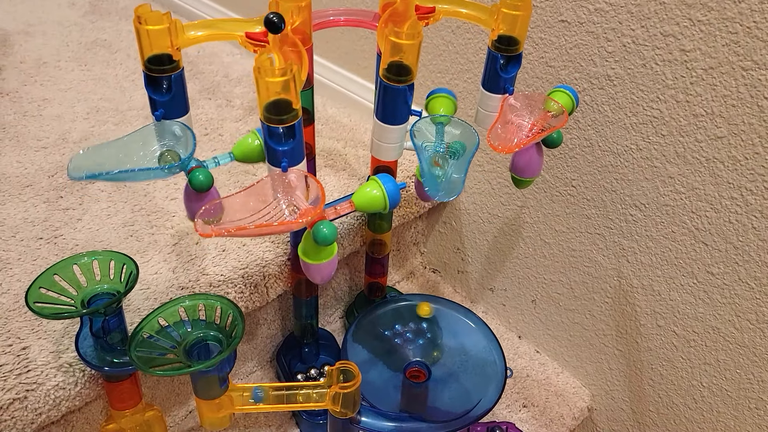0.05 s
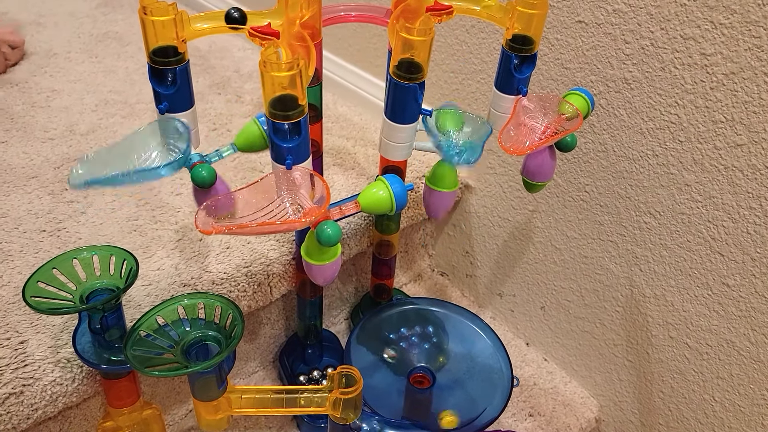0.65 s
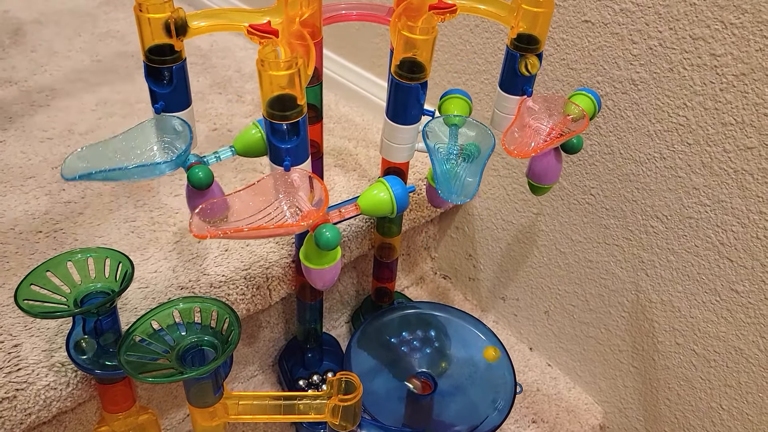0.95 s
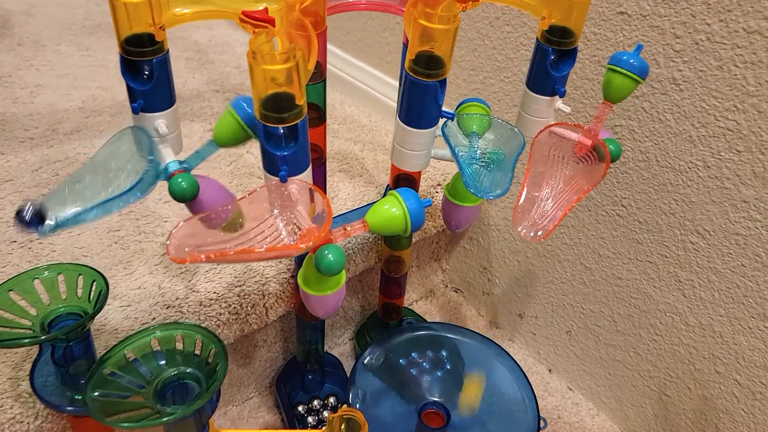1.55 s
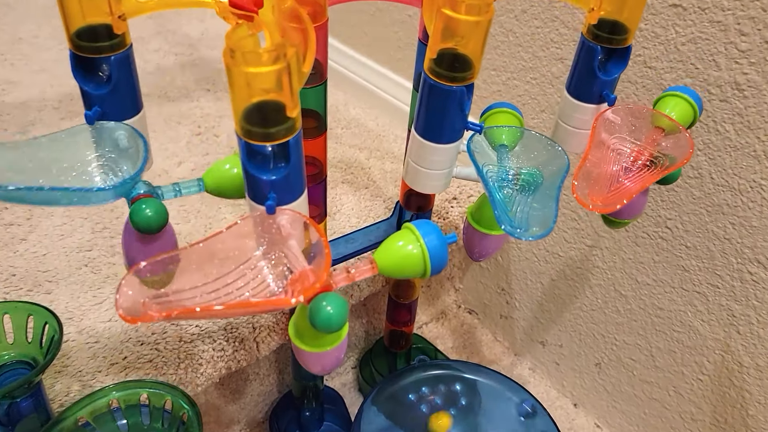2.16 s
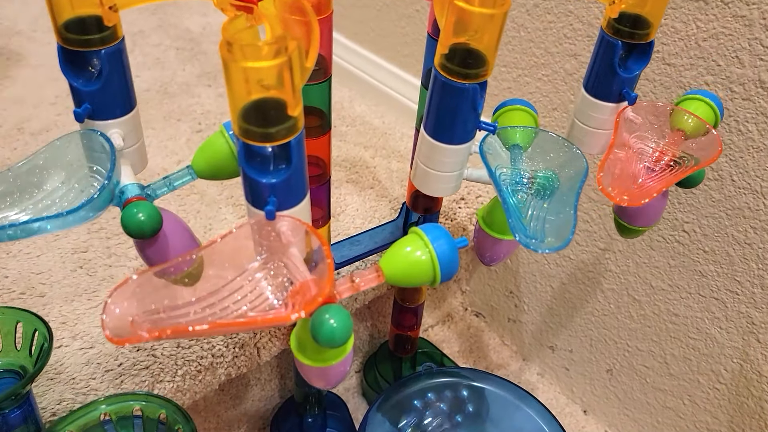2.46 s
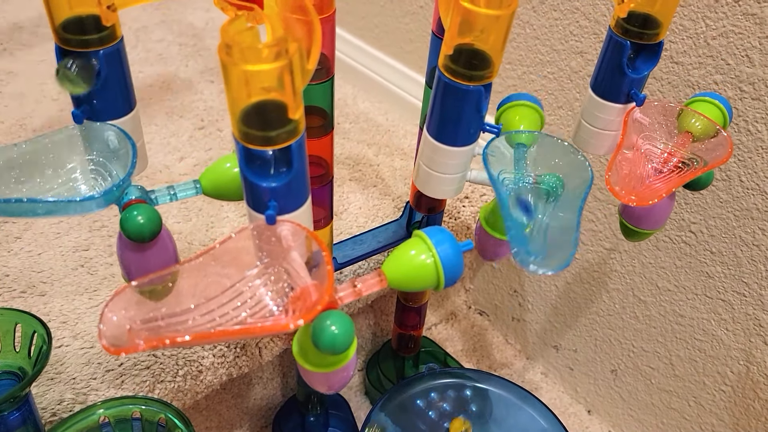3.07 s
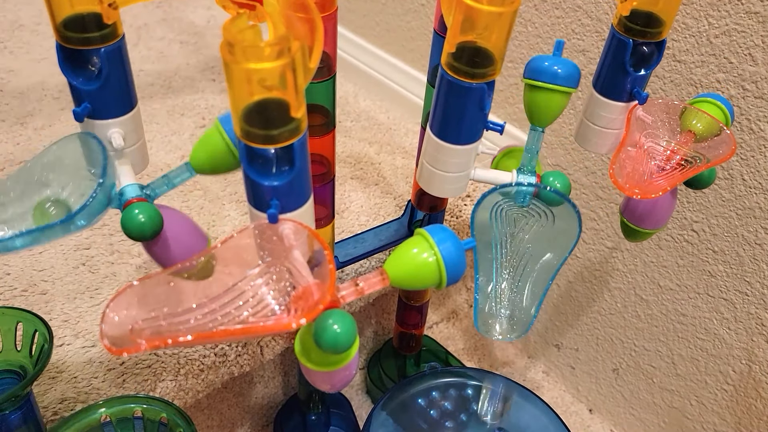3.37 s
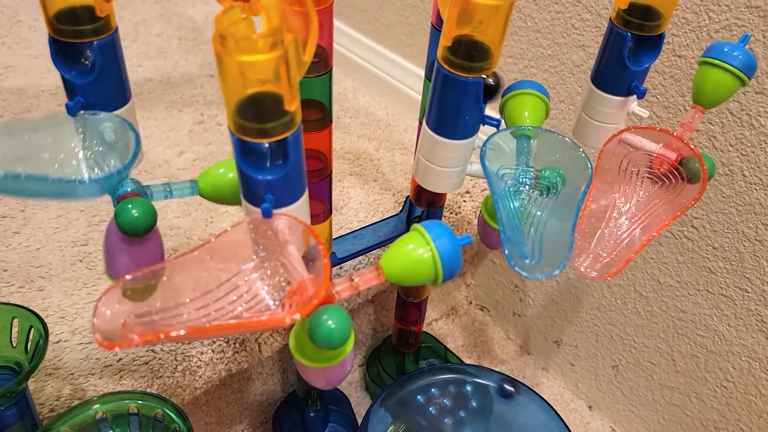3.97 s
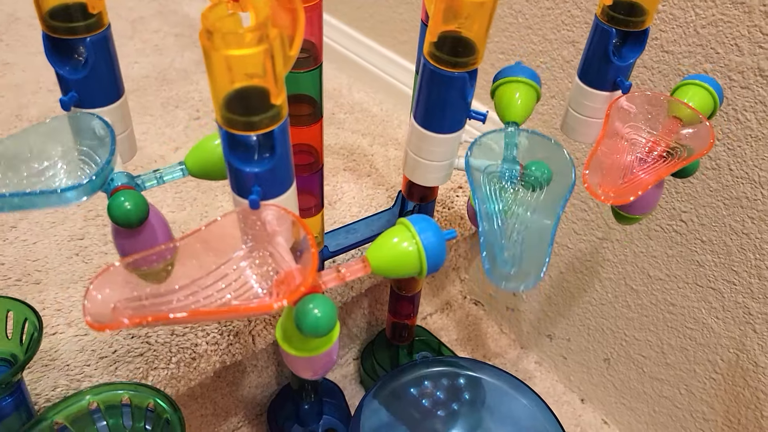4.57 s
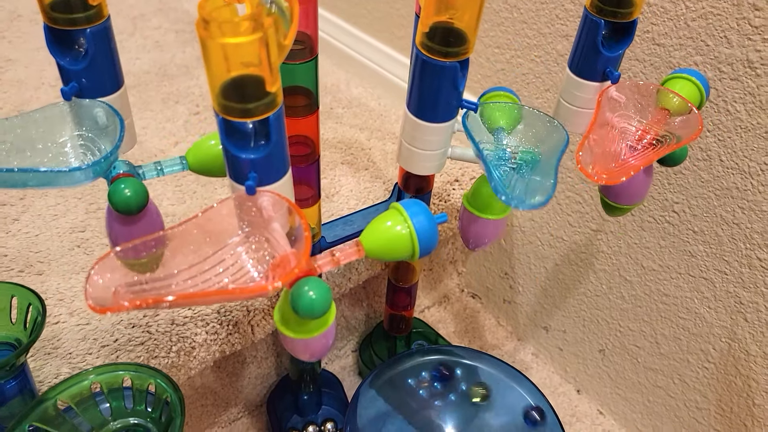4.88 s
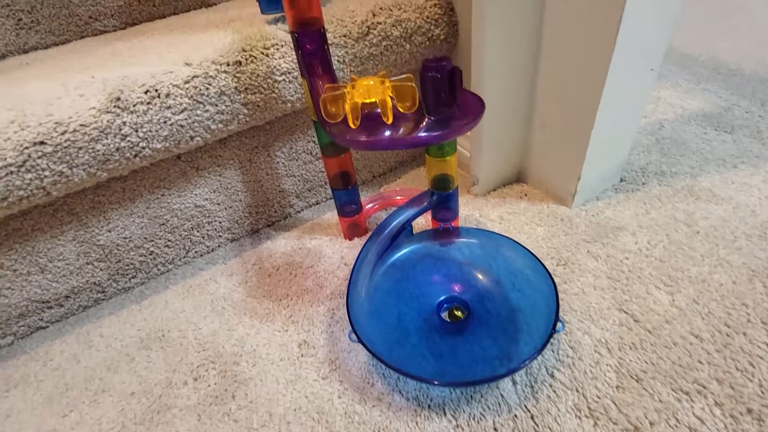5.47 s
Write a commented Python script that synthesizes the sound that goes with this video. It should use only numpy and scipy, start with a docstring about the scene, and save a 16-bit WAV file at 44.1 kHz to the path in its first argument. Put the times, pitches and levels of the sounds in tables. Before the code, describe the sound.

Glass marbles clatter through a plastic marble run with dense clicks, rattles and hollow knocks, then stop abruptly.

```python
"""Glass marbles run through a plastic marble run in a small room. They chatter over seams and ribs,
drop into hollow parts with a knock, clack on stiff rims, tumble down towers and set tipping scoops ringing.
The plastic speaks in short bursts of coloured noise; decaying sines give cavities and scoops their pitch.
The clatter ends abruptly and leaves only a low room tone."""
import sys
import numpy as np
from scipy import signal
from scipy.fft import rfft, irfft, next_fast_len
from scipy.io import wavfile
from scipy.ndimage import uniform_filter1d, map_coordinates

SR = 44100
rng = np.random.default_rng(int(sys.argv[2]) if len(sys.argv) > 2 else 0)


def pcm_store(signal):
    """Save signal as 16-bit PCM."""
    levels = np.round(np.clip(np.atleast_2d(signal), -1, 1) * 32767)
    wavfile.write(sys.argv[1], SR, levels.astype(np.int16).T)


N = 248238


def amp(db):
    """Decibels to gain."""
    return 10 ** (np.asarray(db) / 20)


def curve_at(points, hz):
    """Read a curve of (freq_hz, value) points on a log frequency axis."""
    freqs, values = np.transpose(points)
    return np.interp(np.log(hz + 1), np.log(freqs + 1), values)


def fade(t, t60):
    """Exponential decay, 60 dB down after t60 seconds."""
    return np.exp(-np.log(1000) * t / t60)


def equalise(x, response):
    """Shape x with a gain that is a function of frequency."""
    n = x.shape[-1]
    size = next_fast_len(n + 2048)
    return irfft(rfft(x, size) * response(np.fft.rfftfreq(size, 1 / SR)), size)[..., :n]


def wobble(rate_hz):
    """A smooth random curve with rate_hz knots a second."""
    return map_coordinates(rng.standard_normal(int(N * rate_hz / SR) + 4), [np.arange(N) * rate_hz / SR])


# Registers of the track, from tower thump up to contact tick: low_hz, high_hz
BANDS = [(130, 560), (520, 1150), (1200, 5200), (4600, 18000)]
TOWER_BAND, CAVITY_BAND, SHELL_BAND, CONTACT_BAND = BANDS
# Tone colour of the plastic: freq_hz, gain_db
PLASTIC_EQ = [(180, -4), (260, -1), (370, 9.5), (540, -5.5), (830, 5), (1150, -3), (1550, 6.5), (2050, 1),
              (3300, 2), (4400, -3), (5300, -9.5), (7700, -8.5), (8500, -6), (9600, -10), (12500, -11),
              (15500, -9.5)]
def plastic_hit(t, band, t60, rise_s=0.00016, order=4):
    """Struck plastic: a crowd of damped modes, played as a burst of band-passed noise."""
    decay = fade(t, t60)
    modes = equalise(rng.standard_normal(len(t)), lambda hz: amp(curve_at(PLASTIC_EQ, hz)))
    attack = 1 - np.exp(-t / rise_s)  # the blow takes a moment to spread through the part
    bandpass = signal.butter(order, band, "bandpass", fs=SR, output="sos")
    burst = signal.sosfilt(bandpass, modes * decay * attack)
    return burst * np.linalg.norm(decay) / np.linalg.norm(burst)


# Reverb time of the small room: freq_hz, t60_s
ROOM_DECAY = [(200, 0.21), (1000, 0.18), (4000, 0.18), (14000, 0.15)]
def in_room(x, wet_db, spread_s=0.0003, mono_below_hz=130, build_s=0.0044):
    """Place a sound at a random spot in stereo: the direct sound, then the close walls."""
    hz, t, noise = signal.stft(rng.standard_normal((2, SR // 3)), SR, nperseg=128)
    alike = 1 / (1 + (hz[:, None] / mono_below_hz) ** 2)  # long waves reach both sides alike
    noise[1] = alike * noise[0] + np.sqrt(1 - alike ** 2) * noise[1]
    tail = signal.istft(noise * fade(t, curve_at(ROOM_DECAY, hz)[:, None]), SR, nperseg=128)[1]
    tail *= 1 - np.exp(-np.arange(tail.shape[1]) / SR / build_s)
    paths = amp(wet_db) * tail / np.linalg.norm(tail, axis=1, keepdims=True)
    lag = int(np.clip(rng.normal(0, spread_s), -2 * spread_s, 2 * spread_s) * SR)
    paths[0, max(lag, 0)] += 1
    paths[1, max(-lag, 0)] += 1
    return signal.fftconvolve(x[None], paths, axes=1)


def add(track, start_s, sound):
    """Mix a stereo sound into the track."""
    place = track[:, max(round(start_s * SR), 0):][:, :sound.shape[1]]
    place += sound[:, :place.shape[1]]


# Fader ride for how hard the marbles roll: time_s, level_db
ROLL_RIDE = [(0.0, -45.5), (0.2, -53), (0.52, -53), (0.85, -49.5), (1.15, -56), (1.4, -48.5), (1.85, -43.5),
             (2.12, -48), (2.3, -43), (2.45, -49), (2.75, -46), (2.88, -55.5), (3.2, -43.5), (3.5, -50.5),
             (3.7, -44), (4.18, -44.5), (4.3, -50), (5.12, -45.5)]
def roll_levels(tumble):
    """Rumble and chatter envelopes in dB: rolling is mostly chatter, tumbling adds weight."""
    roll = amp(np.interp(np.arange(N) / SR, *np.transpose(ROLL_RIDE)))
    rumble = np.hypot(amp(-26.5) * roll, tumble)
    chatter = np.hypot(roll, amp(13) * tumble)
    return 20 * np.log10(rumble), 20 * np.log10(chatter)


def rolling(rumble_db, chatter_db, parts=6, skips_per_s=110, scatter_db=6, wander_db=5, colour_db=2):
    """Marbles skip over seams and ribs: tiny impacts, each part of the track with its own modes."""
    hollow_db = (rumble_db + chatter_db) / 2 + 0.43
    forces = amp([rumble_db + 3, hollow_db, chatter_db - 1.5, chatter_db - 6])  # one per register
    t60s = [0.11, 0.032, 0.026, 0.016]
    track, t = np.zeros((2, N)), np.arange(SR // 10) / SR
    turns = np.array([wobble(6) for _ in range(parts)])  # the marbles move on, so the parts take turns
    hits = rng.random((parts, N)) < skips_per_s / SR
    skips = hits * amp(scatter_db * rng.standard_normal((parts, N)) + wander_db * turns)
    skips *= rng.choice([-1, 1], skips.shape)
    power = uniform_filter1d(np.sum(skips ** 2, axis=0), size=3000)
    skips /= np.sqrt(np.abs(power) + 1e-9)  # level out, so the envelopes set the loudness
    for part in skips:
        sound = np.zeros(N)
        for force, band, t60 in zip(forces, BANDS, t60s):
            body = plastic_hit(t, band, t60)
            blows = part * force
            # no two skips stir the registers in quite the same proportion
            blows[part != 0] *= amp(colour_db * rng.standard_normal(np.count_nonzero(part)))
            sound += signal.oaconvolve(blows, body / np.linalg.norm(body))[:N]
        add(track, 0, in_room(sound, wet_db=-3))
    return track


# Tone colour of the quiet room: freq_hz, gain_db
ROOM_TONE_EQ = [(25, -24), (40, -18), (55, -5.5), (70, 3), (90, -2.5), (120, -6.5), (165, -23),
                (350, -21.5), (600, -28), (950, -28), (1220, -21), (1600, -28.5), (3600, -38.5),
                (9000, -53.5)]
def room_tone(level_db=-72.5, wide_above_hz=380):
    """A low steady rumble of the house, alike on both sides in the bass."""
    mid, side = equalise(rng.standard_normal((2, N)), lambda hz: amp(curve_at(ROOM_TONE_EQ, hz)))
    side = equalise(side, lambda hz: hz / np.hypot(hz, wide_above_hz))
    bed = np.array([mid + side, mid - side])
    return amp(level_db) * bed / np.sqrt(np.mean(bed ** 2))


def mode(t, hz, t60):
    """One ringing mode that builds up over its first cycles."""
    attack = (1 - np.exp(-t * hz)) ** 2
    return np.sqrt(2) * np.sin(2 * np.pi * (hz * t + rng.random())) * fade(t, t60) * attack


def rebounds(t, mean_gap_s=0.011, first_bounce_db=-8, count=3):
    """Pulses of a marble that lands, then skips a few times, ever weaker."""
    times = np.cumsum(mean_gap_s * (0.5 + rng.random(count)))
    pulses = np.zeros(len(t))
    pulses[0] = 1
    pulses[(times * SR).astype(int)] += amp(first_bounce_db * np.sqrt(np.arange(count) + 1))
    return pulses


def strike(t, crack_band, crack_db, tick_db):
    """Glass on plastic: a hard snap at first contact, with a crack and glint that repeat on rebounds."""
    snap = amp(tick_db + 1) * plastic_hit(t, CONTACT_BAND, t60=0.0025, rise_s=0.0001)
    crack = amp(crack_db) * plastic_hit(t, crack_band, t60=0.013, rise_s=0.0004, order=2)
    glint = amp(tick_db - 2.5) * plastic_hit(t, CONTACT_BAND, t60=0.031, rise_s=0.00018)
    return snap + signal.fftconvolve(crack + glint, rebounds(t))[:len(t)]


# Marbles dropping into hollow parts: start_s, pitch_hz, level_db, hardness_db (lifts the strike)
DROPS = [(0.002, 630, -38, -1.5), (0.344, 860, -23, 0.5), (0.647, 864, -37, -4.5), (0.682, 680, -39.5, -2),
         (1.504, 764, -30, 10), (1.533, 910, -36.5, 3.5), (1.664, 1014, -29.5, 3.5),
         (1.834, 885, -41, 11.5), (2.179, 555, -41.5, 3), (2.487, 816, -34, 2.5), (2.508, 670, -36.5, 10),
         (2.637, 822, -34, 1.5), (3.113, 680, -46, 10), (3.257, 615, -43, -8), (3.295, 716, -36.5, -13),
         (3.361, 776, -24.5, -3), (3.94, 735, -40, 16.5), (4.109, 900, -44, 20), (4.361, 897, -36, 8.5),
         (4.42, 1040, -37.5, -2), (4.488, 608, -43, 5), (4.517, 687, -39, 5.5), (4.556, 880, -32, 0.5),
         (4.718, 756, -41, 8), (4.76, 660, -40.5, 6), (4.876, 706, -38.5, 4.5), (4.93, 890, -38, 7),
         (5.081, 870, -37.5, 2)]
def hollow_knocks(rumble_db, wall_band_hz=(1150, 3680)):
    """Each drop thumps the tower, sounds a cavity and cracks on its wall."""
    track, t = np.zeros((2, N)), np.arange(SR // 10) / SR
    for start_s, pitch_hz, level_db, hardness_db in DROPS:
        tone = mode(t, pitch_hz, t60=0.047) + amp(-8) * mode(t, 1.7 * pitch_hz, t60=0.015)
        body = amp(2.5) * plastic_hit(t, (0.79 * pitch_hz, 2.04 * pitch_hz), t60=0.019, order=3)
        # a knock thumps harder while the marbles are inside the towers
        thump_db = (level_db + rumble_db[round(start_s * SR)]) / 2 - 4
        thump = amp(thump_db) * plastic_hit(t, TOWER_BAND, t60=0.045)
        strike_db = level_db + hardness_db
        crack = strike(t, wall_band_hz, strike_db + 0.05, strike_db - 1.07)
        add(track, start_s, in_room(thump + amp(level_db) * (tone + body) + crack, wet_db=-0.5))
    return track


# Marbles hitting stiff rims and each other: start_s, clack_db, tick_db
RIM_HITS = [(0.059, -32, -33), (0.264, -32.5, -38.5), (0.295, -33.5, -38), (0.41, -31, -33.5),
            (0.581, -36, -44), (0.675, -48, -28.5), (0.766, -33, -36.5), (0.967, -36.5, -39),
            (1.449, -26.5, -32.5), (1.741, -20.5, -30.5), (1.754, -26, -26.5), (1.785, -22, -18.5),
            (1.946, -29.5, -29.5), (1.982, -24.5, -25.5), (2.013, -27, -52.5), (2.046, -22, -24),
            (2.064, -24, -24.5), (2.195, -25.5, -36), (2.213, -19.5, -32), (2.241, -31, -18.5),
            (2.323, -24, -31), (2.446, -28.5, -39), (2.544, -27, -33.5), (2.615, -49, -30),
            (2.832, -28.5, -34), (2.897, -30.5, -39.5), (3.04, -32, -36.5), (3.435, -28, -33),
            (3.502, -30.5, -33.5), (3.762, -30.5, -33.5), (3.852, -29.5, -26.5), (4.079, -53, -24),
            (4.298, -35, -33.5), (4.814, -39, -30.5), (5.056, -34, -39)]
def rim_clacks(rim_band_hz=(1600, 5830)):
    """A hit on a stiff rim is bright and hardly stirs the cavity behind it."""
    track, t = np.zeros((2, N)), np.arange(SR // 10) / SR
    for start_s, clack_db, tick_db in RIM_HITS:
        hollow = amp(clack_db - 19) * plastic_hit(t, CAVITY_BAND, t60=0.0083)
        clack = strike(t, rim_band_hz, clack_db - 1.5, tick_db - 2.5)
        add(track, start_s, in_room(hollow + clack, wet_db=0.05))
    return track


# Marbles tumbling down inside a tower: start_s, hold_s, level_db
TUMBLES = [(0.353, 0.028, -69), (1.451, 0.023, -57.5), (1.518, 0.051, -52), (2.039, 0.021, -59.5),
           (3.28, 0.057, -64), (3.867, 0.23, -60.5), (4.356, 0.016, -59.5), (4.467, 0.015, -60.5),
           (4.739, 0.041, -60.5)]
def tumble_envelope(attack_db_per_s=695.5, release_db_per_s=138.5):
    """Gain of the tower rumble: each tumble swells fast, holds and dies away."""
    envelope, t = np.zeros(N), np.arange(N) / SR
    for start_s, hold_s, level_db in TUMBLES:
        attack_db = attack_db_per_s * np.clip(start_s - t, 0, 1)
        release_db = release_db_per_s * np.clip(t - start_s - hold_s, 0, 1)
        envelope += amp(level_db - attack_db - release_db)
    return envelope


# Long modes of each struck scoop: pitch_hz, level_db, base_t60_s
SCOOP_MODES = { "a": [(1502, -20, .15), (2266, -4, .15), (2640, -10, .1), (3372, -2, .15), (3560, -12, .07),
               (4424, -20, .2)], "b": [(2437, -13, .16), (2583, -9, .11), (2672, -12, .1), (2865, -15, .1),
               (3338, -16, .14), (3565, -18, .08), (4390, -30, .25)], "c": [(3075, -17, .1),
               (3352, -8, .14), (4350, -24, .1), (5520, -22, .1)], "d": [(2230, -11, .14), (3365, -9, .14),
               (4430, -8, .14), (5600, -21, .12)]}
# Band of short modes that make each scoop's clink: low_hz, high_hz
CLINK_BANDS = {"a": (2640, 2800), "b": (2450, 2700), "c": (3100, 3620), "d": (2850, 5800)}
# Marbles landing on a scoop: start_s, level_db, scoop
LANDINGS = [(1.021, -40.5, "a"), (1.043, -29, "a"), (1.06, -33, "a"), (1.166, -46.5, "a"),
            (1.204, -48, "d"), (1.243, -35, "d"), (1.264, -32.5, "d"), (1.279, -38, "d"),
            (1.32, -38.5, "d"), (1.796, -28.5, "d"), (2.292, -33.5, "c"), (2.36, -35, "c"),
            (2.703, -31, "b"), (2.932, -21, "b"), (2.958, -31.5, "b"), (3.126, -23, "c"),
            (3.437, -38.5, "c"), (4.033, -31, "d"), (4.035, -30, "b"), (4.077, -32, "d"), (4.09, -26, "c"),
            (4.11, -40, "b")]
def scoop_rings(decay_scale=0.88):
    """A stiff scoop ticks, clinks and rings briefly."""
    track, t = np.zeros((2, N)), np.arange(SR // 4) / SR
    for start_s, level_db, scoop in LANDINGS:
        ring = sum(amp(db) * mode(t, hz, decay_scale * t60) for hz, db, t60 in SCOOP_MODES[scoop])
        clink = amp(level_db + 3) * plastic_hit(t, CLINK_BANDS[scoop], t60=0.015, rise_s=0.0002, order=2)
        tick = amp(0.4 * level_db - 21.5) * plastic_hit(t, CONTACT_BAND, t60=0.014, rise_s=0.00014)
        add(track, start_s, in_room(amp(level_db) * ring, wet_db=-1, spread_s=0.00008))
        add(track, start_s, in_room(clink + tick, wet_db=1.5))
    return track


def scene(stop_s=5.123, cut_s=0.004):
    """The running marbles, cut short, over the room tone."""
    rumble_db, chatter_db = roll_levels(tumble_envelope())
    marbles = hollow_knocks(rumble_db) + rim_clacks() + scoop_rings() + rolling(rumble_db, chatter_db)
    gate = np.clip((stop_s - np.arange(N) / SR) / cut_s + 1, 0, 1)
    return marbles * gate + room_tone()


def record(dry, cutoff_hz=15950):
    """A steep low-pass takes off the very top."""
    return equalise(dry, lambda hz: 1 / np.sqrt(1 + (hz / cutoff_hz) ** 200))


dry = scene()
out = record(dry)
pcm_store(out)
```